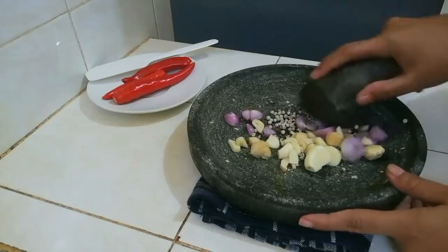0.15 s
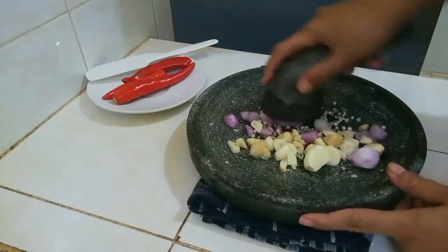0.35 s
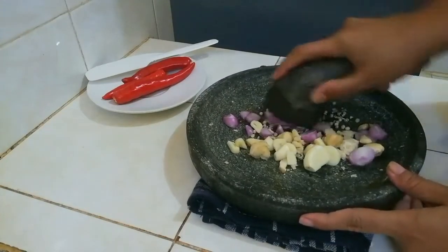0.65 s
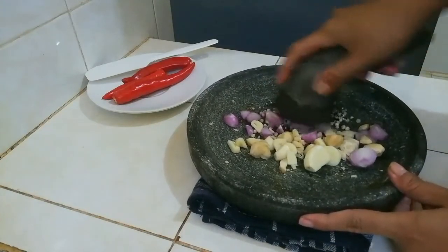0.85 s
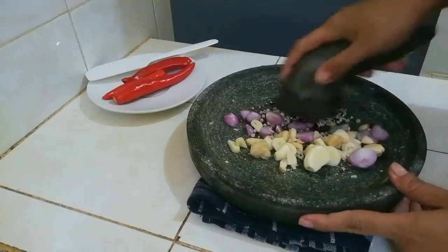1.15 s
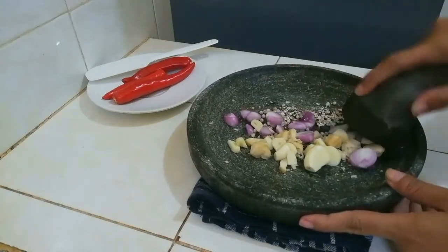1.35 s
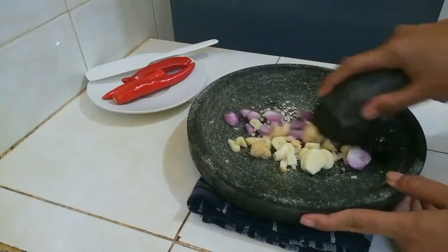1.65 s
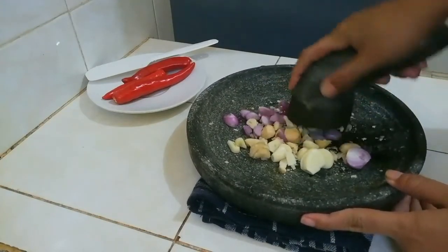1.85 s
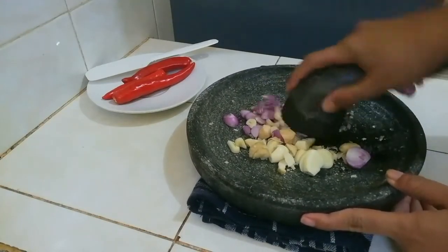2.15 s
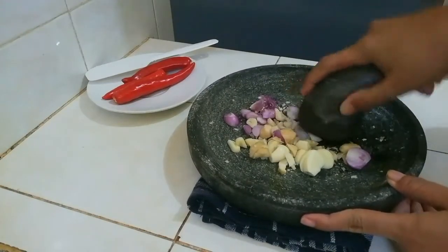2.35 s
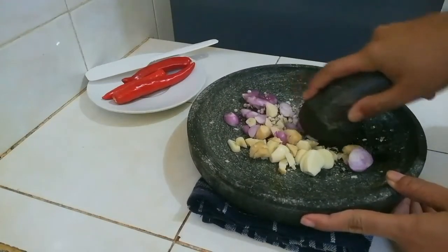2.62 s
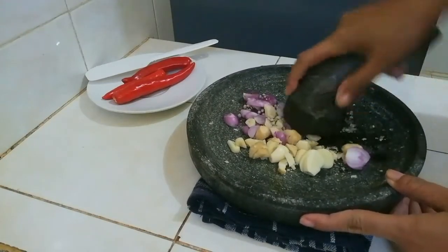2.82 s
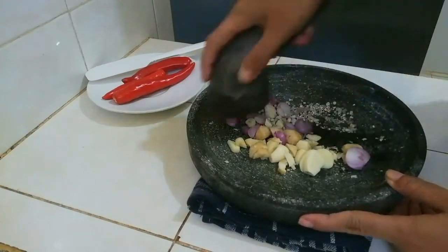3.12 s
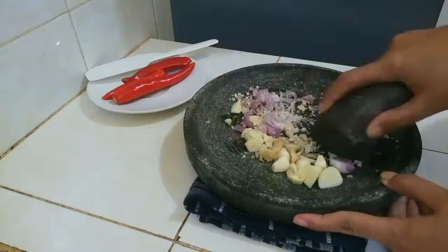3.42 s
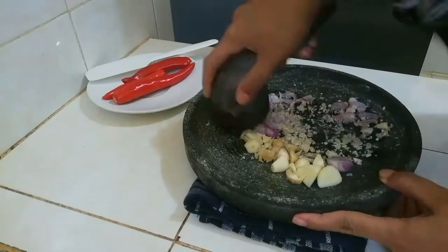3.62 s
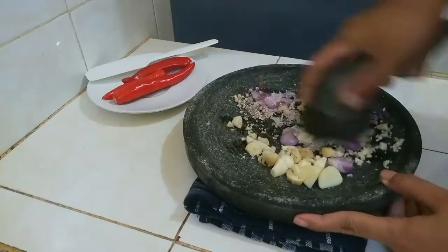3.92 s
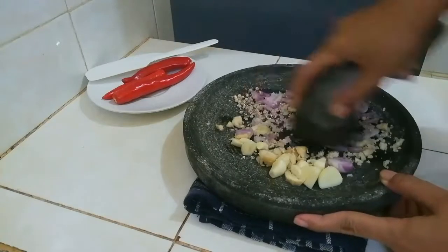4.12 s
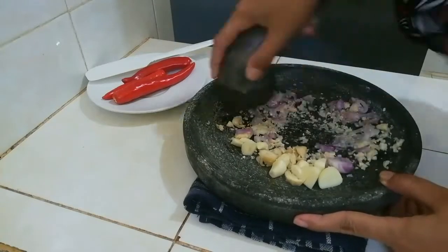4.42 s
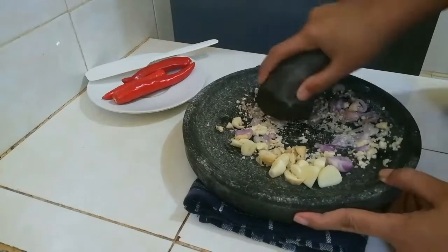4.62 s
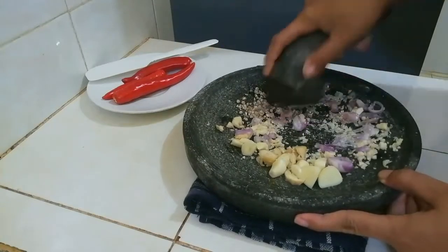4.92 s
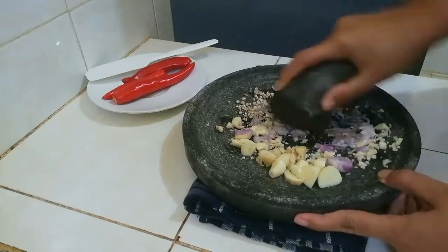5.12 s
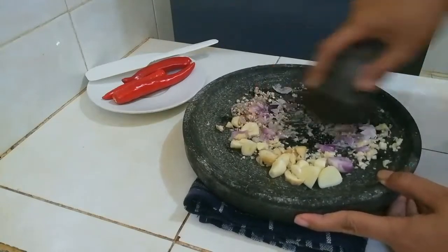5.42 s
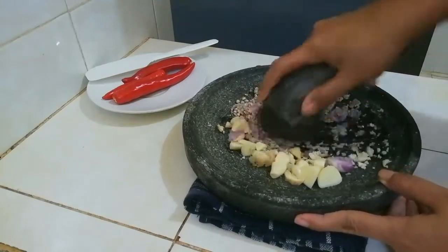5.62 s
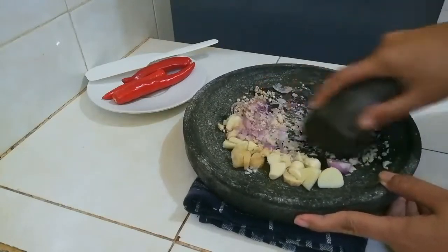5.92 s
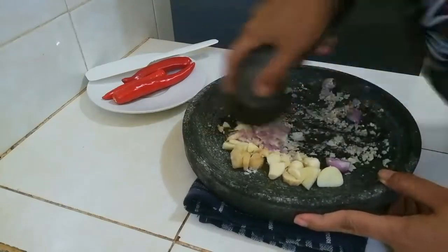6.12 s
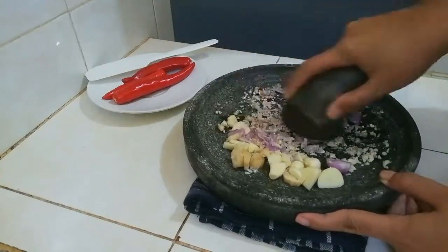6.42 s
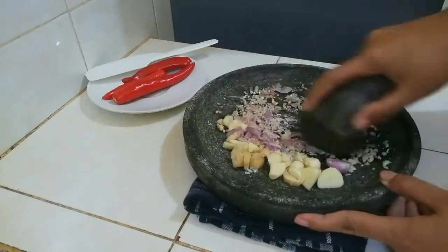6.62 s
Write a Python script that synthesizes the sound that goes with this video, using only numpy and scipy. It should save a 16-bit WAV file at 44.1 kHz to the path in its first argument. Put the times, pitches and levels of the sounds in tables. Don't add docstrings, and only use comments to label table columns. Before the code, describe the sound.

A fading stone knock opens, then quick uneven grinding strokes crackle and rub in a heavy mortar. Short gaps separate four bouts. The first two are lighter, with taps and popping seeds; from the middle on, loud hollow clacks ring briefly and are choked by the pestle. Near microphone, short hard tile reflections, quiet refrigerator hum and air.

```python
import sys
import numpy as np
from scipy import signal
from scipy.fft import rfft, irfft, next_fast_len
from scipy.io import wavfile
from scipy.ndimage import uniform_filter1d, map_coordinates

SR = 44100
rng = np.random.default_rng(int(sys.argv[2]) if len(sys.argv) > 2 else 0)


def undo_db(level):
    steps = np.asarray(level, float) / 20
    return 10 ** steps


def materialize(psi):
    bounded = np.clip(np.atleast_2d(psi).T, -1, 1)
    quanta = np.round(bounded * 32767).astype(np.int16)
    wavfile.write(sys.argv[1], SR, quanta)


N = 297675

# peak in seconds, length in
# seconds, grit level from speed in dB, counter level from weight in dB, bowl ring level in dB.
ROCKING_STROKES = [(0.004, 0.067, -52, -34, -34.5), (0.125, 0.27, -47, -42.5, -57),
                   (0.218, 0.055, -28.5, -27, -32), (0.278, 0.094, -36, -35, -46),
                   (0.368, 0.094, -36, -38.5, -41.5), (0.551, 0.048, -34.5, -33.5, -42.5),
                   (0.619, 0.051, -35.5, -31.5, -50), (0.678, 0.056, -31.5, -34.5, -38),
                   (0.721, 0.13, -46.5, -43, -47.5), (0.887, 0.082, -42.5, -39.5, -39.5),
                   (0.995, 0.065, -39.5, -33.5, -39.5), (1.05, 0.17, -55, -47, -59),
                   (1.231, 0.052, -70, -56, -47.5),
                   (1.478, 0.083, -40.5, -45.5, -68), (1.551, 0.095, -37.5, -44.5, -55.5),
               (1.624, 0.079, -48, -43.5, -51), (1.72, 0.075, -34, -30.5, -39),
               (1.852, 0.09, -37, -37, -50.5), (2.032, 0.17, -48.5, -44, -48.5),
               (2.115, 0.039, -43, -36, -44), (2.169, 0.073, -35.5, -36, -39.5),
               (2.294, 0.092, -42, -44, -49.5), (2.397, 0.28, -52, -44.5, -54),
               (2.483, 0.08, -33, -40.5, -47), (2.575, 0.14, -42.5, -46, -54),
               (2.642, 0.056, -45.5, -36, -41), (2.759, 0.054, -50, -36, -41.5),
               (2.84, 0.12, -54, -54, -58),
                   (3.204, 0.015, -43.5, -37, -48), (3.267, 0.046, -31.5, -34, -42),
              (3.365, 0.049, -39.5, -38.5, -41.5), (3.443, 0.051, -38, -35.5, -40),
              (3.664, 0.087, -38.5, -37.5, -44.5), (3.768, 0.046, -33, -41, -44),
              (3.895, 0.089, -45, -45.5, -49), (3.985, 0.068, -34, -35.5, -43),
              (4.088, 0.093, -44.5, -41.5, -44.5), (4.178, 0.051, -34.5, -38.5, -45.5),
              (4.282, 0.062, -39, -46.5, -47.5), (4.364, 0.038, -44.5, -42, -53),
              (4.55, 0.079, -53, -35, -39.5), (4.612, 0.081, -37, -45, -44.5),
              (4.756, 0.057, -51.5, -38, -58), (4.855, 0.11, -42, -37.5, -52.5),
              (4.897, 0.032, -33, -27.5, -47),
                   (5.078, 0.12, -50, -35.5, -42.5), (5.122, 0.083, -35, -35, -44),
               (5.233, 0.041, -43.5, -37, -41), (5.325, 0.056, -35, -33, -42),
               (5.408, 0.028, -51, -62, -85), (5.57, 0.08, -37.5, -30, -39), (5.693, 0.082, -40, -43, -42),
               (5.791, 0.078, -37.5, -37.5, -39.5), (5.896, 0.06, -45.5, -38.5, -51.5),
               (5.971, 0.047, -40, -34, -38), (6.159, 0.079, -38, -29.5, -38),
               (6.273, 0.057, -31.5, -25.5, -45.5), (6.377, 0.094, -40, -39, -43.5),
               (6.483, 0.039, -33, -33, -40.5), (6.581, 0.055, -39, -38.5, -41.5),
               (6.663, 0.043, -41, -35.5, -40)]
STROKES = ROCKING_STROKES
# start in seconds, peak in dB,
# second mode family in dB, third family in dB, crunch in dB.
HEAVY_BLOWS = [
    (3.5869, -9, -19, -18.5, -11.5),
    (3.612, -29.5, -33, -17, -9),
    (4.4919, -15, -1, -8, -3.5),
    (4.981, -23.5, -29, -21, -22),
    (5.0449, -21, -18, -15, -15.5),
    (5.4947, -6.5, -10, -44, -14),
    (5.515, -16.5, -8, -23, -35),
    (6.0842, -7.5, -19, -23, -16.5),
]
# frequency in Hz, level in dB per Hz.
GRIT_COLOUR = [(880, -54), (1500, -15), (1960, -24), (2250, -24.5), (2460, -13), (2770, -8), (3300, -8),
               (5220, -5), (6430, -2), (7610, -11.5), (9010, -7.5), (12600, -15.5), (14600, -15),
               (16000, -19.5)]


def rms(x):
    return np.sqrt(np.mean(x ** 2))


def unit(x):
    return x / np.sqrt(np.mean(x ** 2) + 1e-20)


def along(points, hz):
    f, v = np.transpose(points)
    return np.interp(np.log(hz + 1), np.log(f + 1), v)


def filtered(x, response):
    m = next_fast_len(N + SR // 2)
    return irfft(rfft(x, m) * response(np.fft.rfftfreq(m, 1 / SR)), m)[..., :N]


def coloured(x, spectrum):
    return unit(filtered(x, lambda hz: undo_db(along(spectrum, hz))))


def resonant(x, peaks):
    def response(f):
        total = 0
        for k, (centre, width, db) in enumerate(peaks):
            damping = 1j * f * width
            total = total + (-1) ** k * undo_db(db) * damping / (centre ** 2 - f ** 2 + damping)
        return total
    return unit(filtered(x, response))


def wobble(rate):
    knots = rng.standard_normal(int(N * rate / SR) + 4)
    return map_coordinates(knots, [np.arange(N) * rate / SR])


def kitchen():
    # frequency in Hz, level in dB rms.
    hum_lines = [(49.9, -64), (100.4, -61), (150.7, -67), (200.2, -71), (250.2, -69), (299.5, -66),
                 (441.8, -72), (491, -74), (540.1, -69), (589.2, -72)]
    # frequency in Hz, level in dB per Hz.
    air_colour = [(15, -39), (25, -15), (33, 11), (102, -12), (301, -4), (373, -9), (531, -4.5),
                  (641, -12.5), (863, -16.5), (1560, -18), (4500, -23), (7710, -32), (16000, -36)]
    # frequency in Hz, width in Hz, level in dB.
    fan_peaks = [(800, 130, 3), (1580, 150, -6.5)]
    air_db, fan_db = -58.5, -60.5
    t = np.arange(N) / SR
    hum = 0
    for hz, db in hum_lines:
        level = np.sqrt(2) * undo_db(db - 1 + 1.5 * wobble(4.58))
        hum = hum + level * np.sin(2 * np.pi * (hz * t + rng.random()))
    shared, apart = rng.standard_normal((2, N))
    apart = filtered(apart, lambda hz: hz ** 2 / (hz ** 2 + 330 ** 2))
    air = coloured(np.array([shared + apart, shared - apart]), air_colour)
    fan = resonant(rng.standard_normal((2, N)), fan_peaks)
    return hum + undo_db(air_db) * air + undo_db(fan_db) * fan


def knocks():
    # frequency in Hz, level in dB, t60 in seconds, mode family 0-3.
    bowl_modes = [(1297, 4, 0.26, 0), (1380, -12, 0.048, 0), (1310, -24, 0.12, 0), (1300, -33, 0.028, 0),
                  (1660, -16, 0.039, 0), (5450, -28, 0.11, 2), (2265, 8.5, 0.17, 1), (2340, -18, 0.1, 1),
                  (2400, -20, 0.092, 1), (3270, 14, 0.19, 2), (3230, 8, 0.18, 2), (5580, -6, 0.04, 2),
                  (4186, 4.5, 0.085, 3)]
    rolls = [
        (4.4786, -5.5, -13, -44, -15),
        (5.0128, -9.5, -28, -30, -15),
    ]
    earlier_blow = (-.03, -17, -17, -17, -14)
    # start in seconds, peak in dB, second family in dB, crunch in dB.
    light_taps = [(0.188, -40, -1, 4), (0.2082, -28.5, 10, -2), (0.2527, -33, 6.5, -18),
                  (0.534, -33.5, -1, -4), (0.6034, -39, 6, -1), (0.626, -34, -1, 1), (0.6637, -36.5, 2, 1),
                  (0.6752, -39, 9, 4), (0.8753, -40, 0.5, 4), (0.975, -48, -5, -4), (1.213, -49, 4.5, 3.5),
                  (1.6182, -46.5, 10.5, 2.5), (1.6816, -47, 9, -6), (1.7137, -34, -3, -4),
                  (2.1093, -35.5, 4.5, -8), (2.018, -48, 5, -3), (2.7475, -43.5, 4, 6),
                  (3.196, -38.5, -10, -8), (3.57, -56.5, 13, 9), (3.9951, -38.5, 7, 11),
                  (4.0032, -42, -10, 11), (4.7574, -42, -15, -10), (4.845, -40, -20, -10),
                  (4.857, -36.5, -20, -7), (4.772, -56, -14, -8), (5.052, -38, -15, 3),
                  (4.8057, -42, -24, -20), (4.9005, -40, 7, 6.5), (5.074, -48, -14, -10),
                  (5.306, -35, 1, -23), (6.2837, -38.5, 10.5, 7)]
    # share of ring time left,
    # free ring before it settles in seconds.
    grips = [(.6, .02), (.5, .015), (1, .015), (1.3, .018), (1.4, .024), (.6, .008), (.7, .01), (.6, .014),
             (1, .011), (1.1, .018), (.9, .0175)]
    # frequency in Hz, level in dB per Hz.
    crunch_colour = [(250, -14), (500, -4.5), (900, 4), (1800, 5), (2900, -3.5), (3800, -13), (12000, -51)]
    tap_contact_s, heavy_contact_s, roll_contact_s = 0.0034, 0.0019, 0.0085
    scatter_db, detune_share = 1, 0.0015

    blows = []
    for s, db, second, third, crunch in rolls + [earlier_blow] + HEAVY_BLOWS:
        blows.append((s, db, second, third, -48, crunch))
    for s, db, second, crunch in light_taps:
        blows.append((s, db, second, -21, 3 + 0.73 * second, crunch))

    out = np.zeros(N + 2 * SR)
    longest = np.arange(SR * 2 // 5) / SR
    luck = rng.standard_normal((len(blows), 2, len(bowl_modes)))
    rubble = coloured(rng.standard_normal(N), crunch_colour)
    for row, (s, db, second, third, fourth, crunch_db) in enumerate(blows):
        family_db = (0, second, third, fourth)
        t = longest if db > -30 else longest[:SR // 5]
        if row < len(rolls):
            contact_s = roll_contact_s
        else:
            contact_s = heavy_contact_s if db > -25 else tap_contact_s
        if row < len(grips):
            freedom, free_s = grips[row]
        else:
            freedom, free_s = np.clip(1 + (db + 28.5) / 30, 0.4, 1.2), 0.015

        held = np.maximum(t - free_s, 0.57 * t)
        ring = 0
        for (hz, level, t60, family), gain, shift in zip(bowl_modes, *luck[row]):
            if family == 0:
                t60 = t60 * freedom
            mode_db = family_db[family] + level + scatter_db * gain - 60 * held / t60
            ring = ring + undo_db(mode_db) * np.sin(2 * np.pi * hz * (s + (1 + detune_share * shift) * t))

        slow = uniform_filter1d(rng.standard_normal(len(t)), size=250)
        chatter = unit(uniform_filter1d(slow, size=250))
        settled = 1 - np.exp(-(t / free_s) ** 7)
        ring = ring * (1 - settled * (0.68 - 0.2 * np.tanh(chatter)))

        crunch = undo_db(crunch_db + 10.5 - 60 * t / 0.075) * np.roll(rubble, rng.integers(N))[:len(t)]
        thump_db = min(crunch_db + 16.5, -26 - db)
        thump = undo_db(thump_db - 60 * t / 0.055) * np.sin(2 * np.pi * 185 * t)
        onset = 1 - np.exp(-(t / contact_s) ** 2.2)
        start = SR + round((s - 0.002) * SR)
        out[start:start + len(t)] += undo_db(db - 7) * (ring + crunch + thump) * onset
    return out[SR:SR + N]


def contacts(per_s, spread_db, clump_db, hiss, alike):
    chance = rng.random((3, N))
    size = rng.exponential(size=(3, N))
    sign, fine = rng.standard_normal((2, 3, N))
    bumps = unit((chance < per_s / SR) * undo_db(spread_db * np.minimum(size, 3)) * np.sign(sign))
    clumps = undo_db(clump_db * (wobble(45) + 0.54 * wobble(16)))
    shared, left, right = unit((bumps + hiss * fine) * clumps)
    return shared, np.sqrt(alike) * shared + np.sqrt(1 - alike) * np.array([left, right])


def stroke_gain(peak_db, lag_s):
    rise, fall = 0.51, 0.47
    s, length = np.transpose(STROKES)[:2, :, None]
    t = np.arange(0, N, 44) / SR
    phase = (t - s - lag_s) / length
    swell, trail = (phase / rise) ** 2, 2 * np.hypot(1, phase / fall) - 2
    shape_db = -6 * np.where(phase < 0, swell, trail)
    power = np.sum(undo_db(peak_db[:, None] + shape_db) ** 2, axis=0)
    return np.interp(np.arange(N) / SR, t, np.sqrt(power))


def squash():
    squash_db, t60_s = -20.5, 0.15
    t = np.arange(0, N, 44) / SR
    s, db = np.transpose(HEAVY_BLOWS)[:2, :, None]
    fading = undo_db(db + squash_db - 60 * np.abs(t - s) / t60_s)
    return np.interp(np.arange(N) / SR, t, np.sum((t > s) * fading, axis=0))


def patchy(x, depth_db):
    z = signal.stft(x, nperseg=256)[2]
    field = uniform_filter1d(rng.standard_normal(z.shape[1:]), size=6, axis=0)
    field = unit(uniform_filter1d(field, size=5, axis=1))
    return unit(signal.istft(z * undo_db(depth_db * field), nperseg=256)[1][:, :N])


def flickering(x, peaks):
    total = 0
    for centre, width, db in peaks:
        drive = x * undo_db(3.3 * wobble(38))
        total = total + undo_db(db) * np.sqrt(width) * resonant(drive, [(centre, width, 0)])
    return unit(total)


def grinding():
    # frequency in Hz, width in Hz, level in dB.
    rubbed_modes = [(823, 62, -11.5), (1316, 27, -12), (2261.7, 38.5, 4.5), (3257, 37, -12.5),
                    (4207, 57, -6.5), (5160, 120, -13.5), (6490, 68, -11.5)]
    # frequency in Hz, width in Hz, level in dB.
    counter_modes = [(91.8, 19, -4.5), (150.6, 18, 1), (207.7, 13.8, 3.5), (304, 63.5, -8)]
    # frequency in Hz, level in dB per Hz.
    crush_colour = [(250, 1.5), (400, 4), (800, -0.5), (1500, 6.5), (2500, -2.5), (4000, -66)]
    weight_lag_s = 0.0012
    grit_db, weight_db, ring_db = np.transpose(STROKES)[2:]
    push_db = (weight_db + ring_db) / 2 + 41.5
    grit = stroke_gain(grit_db, 0)
    rumble = stroke_gain(weight_db, weight_lag_s)
    ring = stroke_gain(ring_db, weight_lag_s)
    crush = stroke_gain(-46.5 + 0.93 * push_db, 0) + squash()

    _, fine = contacts(5000, spread_db=3, clump_db=2, hiss=0.55, alike=0.18)
    pressure, coarse = contacts(500, spread_db=3.5, clump_db=2.5, hiss=0.6, alike=0.3)
    high = coloured(grit * patchy(fine, depth_db=3), GRIT_COLOUR) * rms(grit) * undo_db(0.5)
    bowl = flickering(ring * coarse, rubbed_modes) * rms(ring) * undo_db(3)
    spice = coloured(crush * coarse, crush_colour) * rms(crush) * undo_db(-1.87)
    slab = resonant(rumble * pressure, counter_modes)
    slab = filtered(slab, lambda hz: 1 / (1 + (hz / 420) ** 4)) * rms(rumble) * undo_db(-1.1)
    return high + bowl + spice + slab


def snaps():
    # start in seconds, peak in dB, pitch in Hz.
    bursting_seeds = [(0.08, -21.5, 6400), (0.1897, -20, 4500), (0.208, -18, 9070), (0.345, -21, 9500),
                      (0.374, -16.5, 8600), (0.535, -23, 6700), (0.6022, -18, 9700), (0.627, -17, 6490),
                      (0.664, -17, 6600), (0.977, -27, 7000), (1.431, -32, 6300), (1.551, -19, 6600),
                      (1.683, -26, 6500), (1.834, -18.5, 8740), (2.1096, -24, 6360), (2.461, -18, 6520),
                      (2.513, -17, 8900), (3.1975, -23.5, 7000), (3.594, -17.5, 4880),
                      (3.7607, -19.5, 9550), (4.554, -14.5, 6400), (4.6432, -19, 8800), (4.98, -18.5, 5340),
                      (5.155, -19, 9900), (5.305, -13.5, 6540), (5.495, -12.5, 6500), (5.5605, -19, 6200),
                      (6.2818, -9, 9160), (6.583, -14.5, 6040), (6.6466, -22, 6570)]
    t60_s, onset_s = 0.013, 0.00087
    out, t = np.zeros(N + SR), np.arange(SR // 20) / SR
    noise = rng.standard_normal((len(bursting_seeds), len(t)))
    for (s, db, hz), n in zip(bursting_seeds, noise):
        pitched = np.sin(2 * np.pi * hz * t) * (1 + 3.1 * uniform_filter1d(n, size=12))
        burst = 0.78 * uniform_filter1d(n, size=3) + pitched
        envelope = undo_db(db - 5 - 60 * t / t60_s) * (1 - np.exp(-t / onset_s))
        out[round(s * SR):][:len(t)] += envelope * burst
    return out[:N]


def ticks():
    # start in seconds, peak in dB.
    cracking_grains = [(0.169, -30), (0.209, -14), (0.6026, -13.5), (1.2126, -41), (1.463, -19),
                       (1.683, -28), (1.8356, -21), (2.1092, -22), (2.1605, -16), (2.36, -28),
                       (2.4262, -28), (2.6364, -25), (3.237, -24), (3.2565, -14), (3.958, -19),
                       (0.9753, -18), (0.5352, -19), (1.6671, -31), (4.8773, -27), (5.0908, -31),
                       (5.2959, -28), (6.2447, -34), (6.4617, -35), (6.4737, -24), (6.5645, -34),
                       (3.4231, -32), (3.703, -25), (3.736, -26.5), (3.9364, -21), (3.994, -29),
                       (4.003, -23), (4.0623, -20), (4.259, -23), (4.2984, -23), (4.4922, -49),
                       (4.787, -31), (4.8903, -23), (5.0439, -32), (5.0718, -18), (5.664, -26),
                       (5.7133, -32), (5.7503, -33), (5.902, -25), (5.9479, -36), (6.257, -25),
                       (6.2825, -8), (6.58, -21)]
    t60_s, onset_s = 0.0088, 0.00086
    shape, t = np.zeros(N + SR), np.arange(SR // 40) / SR
    for s, db in cracking_grains:
        shape[round(s * SR):][:len(t)] += undo_db(db - 2 - 60 * t / t60_s) * (1 - np.exp(-t / onset_s))
    return shape[:N] * coloured(rng.standard_normal(N), GRIT_COLOUR)


def tails(t60_of_hz, length):
    hz, t, z = signal.stft(rng.standard_normal((2, length)), SR, nperseg=128)
    decay = undo_db(-60 * t / t60_of_hz(hz)[:, None])
    tail = signal.istft(z * decay, SR, nperseg=128)[1][:, :length]
    return tail / np.linalg.norm(tail[0])


def answered(x, t60_of_hz, length, hop, colour):
    out, fade = np.zeros((2, N + 4 * hop + length)), np.hanning(2 * hop + 1)[:-1]
    padded = np.pad(x, (hop, 2 * hop))
    for start in range(0, N + hop, hop):
        piece = padded[start:start + 2 * hop] * np.sqrt(fade)
        echo = signal.fftconvolve(piece[None], tails(t60_of_hz, length), axes=1)
        out[:, start:start + 2 * hop + length - 1] += echo
    delayed = out[:, hop - 40:hop - 40 + N]
    return filtered(delayed, lambda hz: undo_db(along(colour, hz)))


def room(rubbing, blows):
    # frequency in Hz, level in dB.
    near_colour = [(250, -14), (600, -3), (1300, -17), (2500, -7), (4000, -4), (12000, -4)]
    # frequency in Hz, t60 in seconds.
    kitchen_t60 = [(200, 0.58), (1300, 0.33), (4000, 0.15), (12000, 0.26)]
    # frequency in Hz, level in dB.
    wet_colour = [(100, -65), (250, -8.5), (600, -7), (3000, -4.5), (12000, -8.5)]
    near = answered(blows, lambda hz: 0.03 + 0 * hz, SR // 25, SR // 4, near_colour)
    tail = answered(rubbing + blows, lambda hz: along(kitchen_t60, hz), SR * 2 // 5, SR // 3, wet_colour)
    return near + tail


def scene():
    lag_s = 6.5 / 44100
    sides = np.array([[1], [-1]])
    rubbing, blows = grinding(), knocks() + snaps() + ticks()
    direct = filtered(rubbing + blows, lambda hz: np.exp(-1j * np.pi * hz * lag_s * sides))
    return direct + room(rubbing[0], blows) + kitchen()


def top_cut(x):
    return signal.sosfilt(signal.butter(12, 16300, fs=SR, output="sos"), x)


def record(dry):
    # frequency in Hz, left minus right in dB.
    port_tilt = [(60, 0.5), (300, 0), (600, 2.5), (1300, 2.5), (2000, 3.5), (3000, -3.5), (5000, 0.5),
                 (6500, -7.5), (7300, -6), (8200, 10), (9500, 14.5), (10600, 11), (12500, 4), (15000, 2.5)]
    ceiling = 0.95
    sides = np.array([[1], [-1]])
    ports = filtered(dry, lambda hz: undo_db(along(port_tilt, hz) / 2 * sides) * (hz < 15850))
    ports = ports / (1 + np.abs(ports / ceiling) ** 4) ** 0.25
    return top_cut(ports)


dry = scene()
out = record(dry)
materialize(out)
```